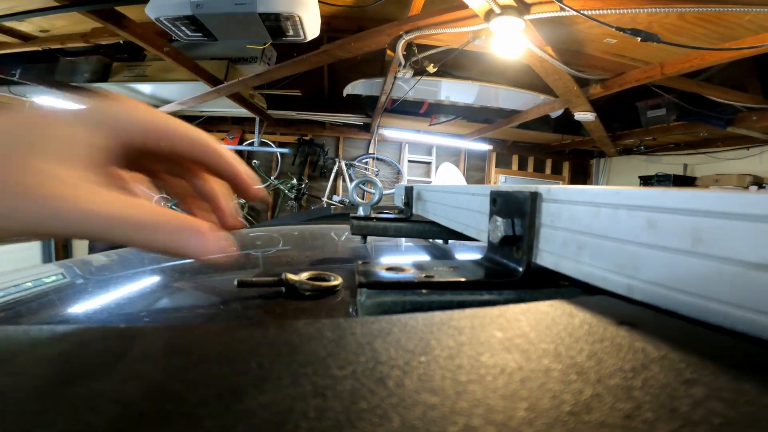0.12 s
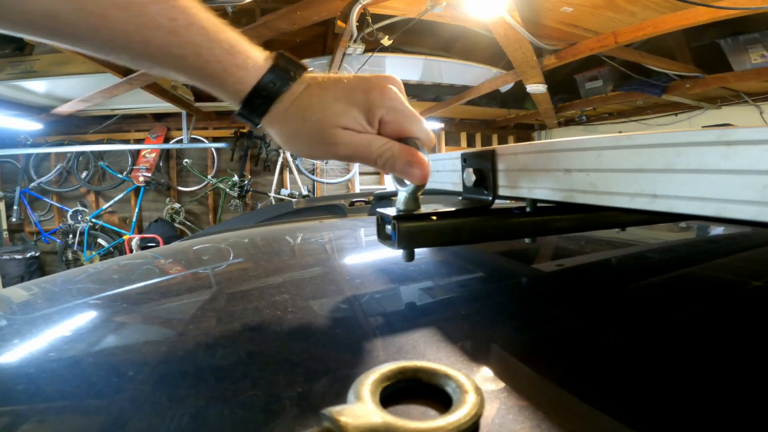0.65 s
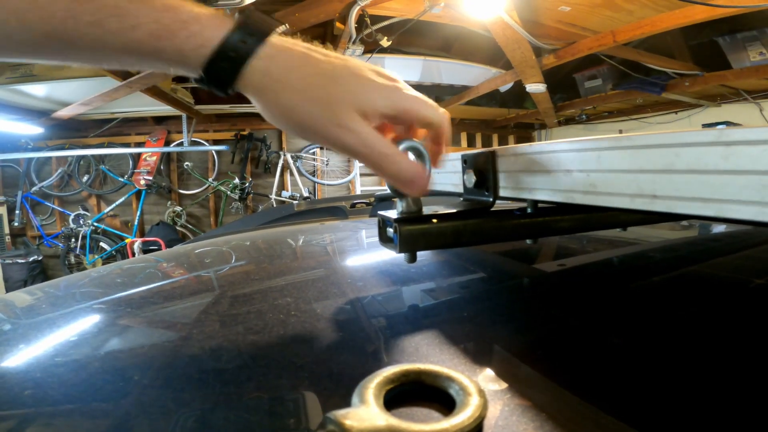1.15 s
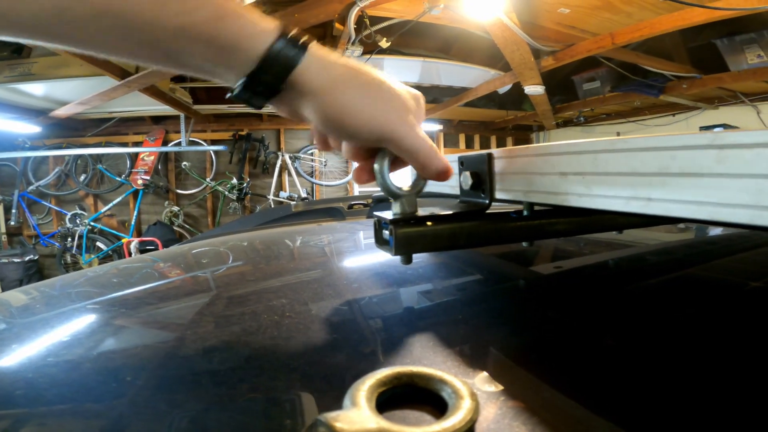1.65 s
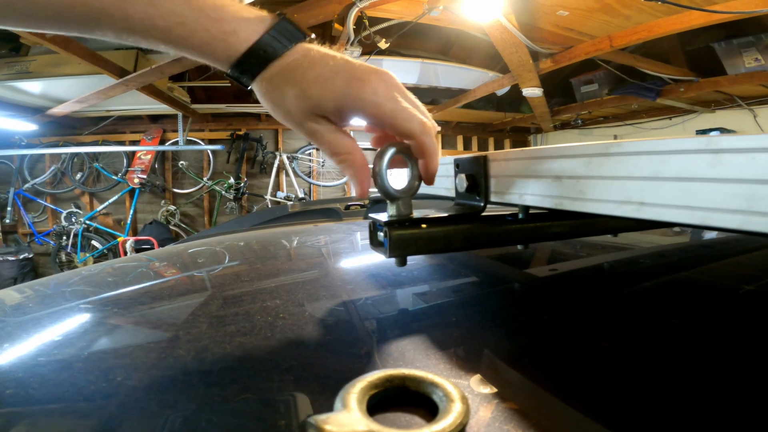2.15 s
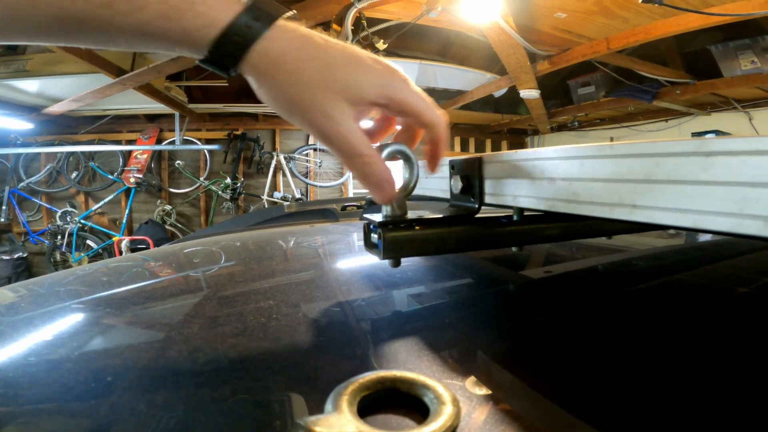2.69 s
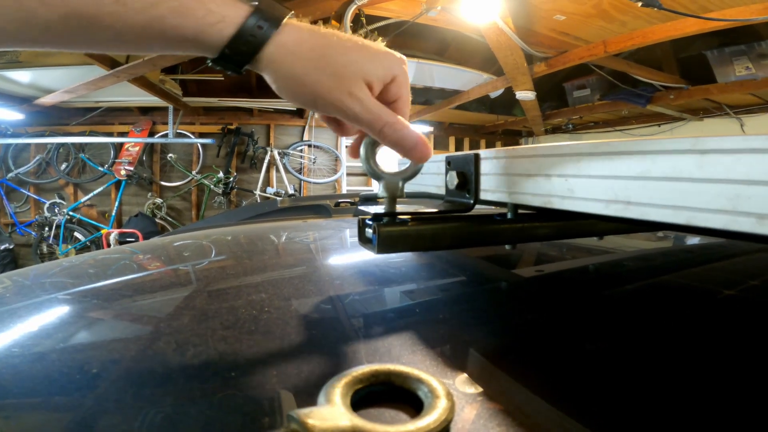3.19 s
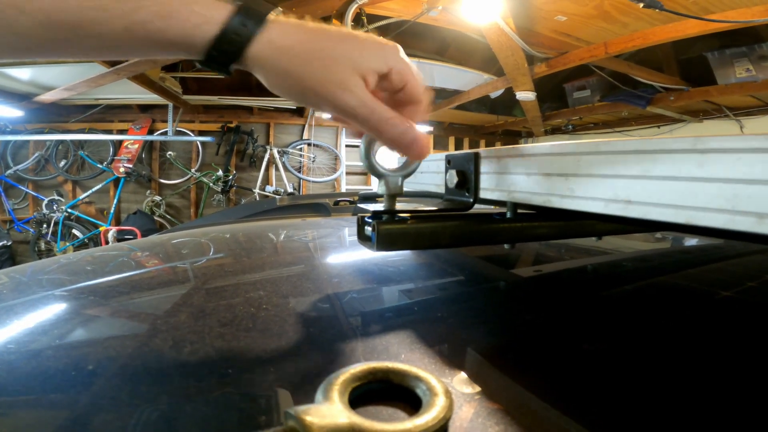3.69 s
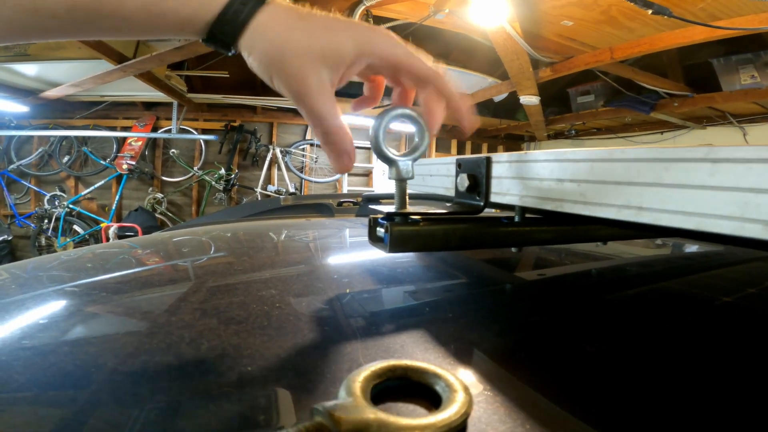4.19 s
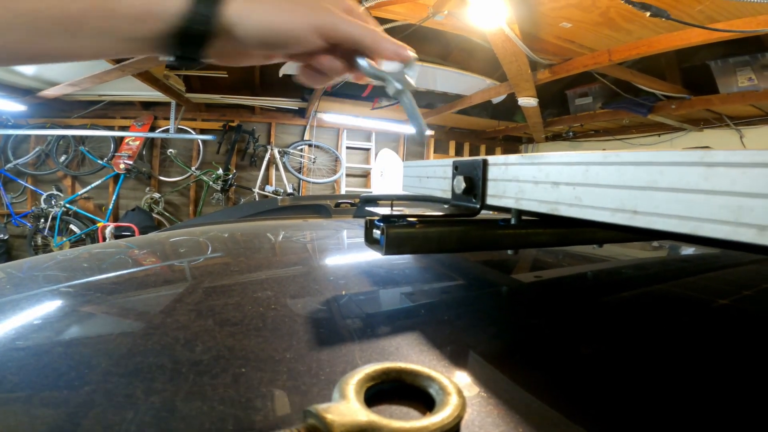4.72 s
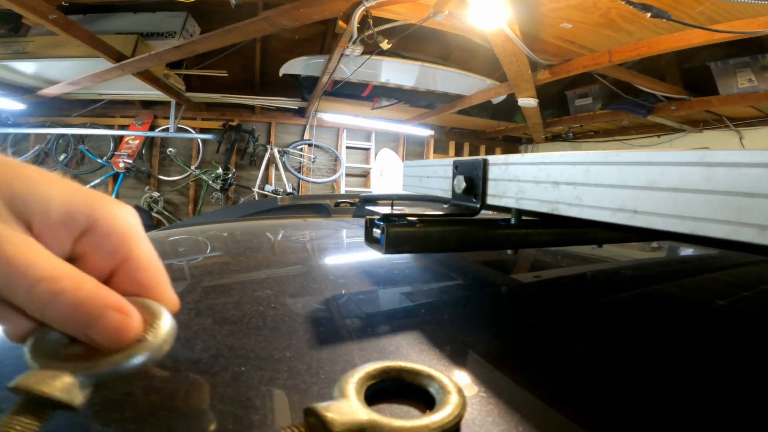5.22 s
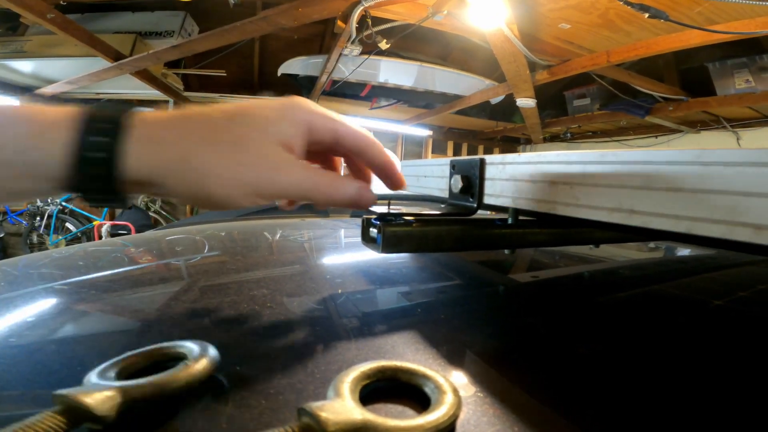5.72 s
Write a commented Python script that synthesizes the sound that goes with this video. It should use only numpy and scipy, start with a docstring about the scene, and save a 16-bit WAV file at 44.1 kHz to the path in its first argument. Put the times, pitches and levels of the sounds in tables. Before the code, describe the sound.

In a garage, a bolt is set down on a car roof with a quick clattering clunk. A hand then loosens a steel eye bolt from a rack channel: one loud knock, then small clicks, scrapes and short squeaks, each drumming dully through the roof. A bright clink frees it; after a pause it lands with several hard clunks. The microphone sits close on the roof, with faint low hum.

```python
"""Metallic chatter, knocks, a wavering squeak and dull drumming on a car roof, over mains hum and faint hiss.
A hand unscrews a steel eye bolt from a roof-rack channel in a garage, heard from the car roof.
Stick-slip catches and blows ring the modes of the channel, the loose bolt and the roof panel.
Bolts set down strike the panel; fading noise bands answer for sheet metal and garage walls."""
import sys
import numpy as np
from scipy import signal
from scipy.fft import rfft, irfft
from scipy.io import wavfile
from scipy.ndimage import uniform_filter1d

SR = 44100
rng = np.random.default_rng(int(sys.argv[2]) if len(sys.argv) > 2 else 0)


def persist_wave(psi):
    """Save psi, clipped to +-1, as 16-bit WAV."""
    counts = np.round(np.clip(psi, -1, 1) * 32767).astype(np.int16)
    wavfile.write(sys.argv[1], SR, np.atleast_2d(counts).T)


def how_loud(loudness_db):
    """Turn decibels into a plain amplitude multiplier (0 dB gives 1, 20 dB gives 10)."""
    steps = np.asarray(loudness_db, float) / 20
    return 10 ** steps


N = 257984

# bolt and fingers knocking the channel:
# (time [s], blow [dB], sharpness [dB], roof panel [dB], bite [dB])
KNOCK_ROWS = [(0.252, -56.5, -77, -39, -74), (0.312, -54, -76, -38, -74), (0.437, -54.5, -60, -17.5, -64),
              (0.562, -49, -72.5, -25, -53.5), (0.75, -5, -17, 2, -10.5), (1.103, -46.5, -46.5, -25.5, -74),
              (1.129, -39.5, -50, -69, -77), (1.446, -16, -41, -7, -31), (1.489, -28.5, -38, -12.5, -38.5),
              (1.993, -47, -41.5, -35, -50.5), (2.078, -68.5, -55.5, -60.5, -70),
              (2.151, -32.5, -56.5, -26.5, -56.5), (2.411, -18, -31, -11, -40.5),
              (2.557, -46, -40, -26, -65), (2.757, -12, -49.5, -10, -21), (2.822, -33, -73, -37, -26.5),
              (3.069, -25.5, -72, -53, -37.5), (3.168, -13, -20.5, -49.5, -12.5),
              (3.476, -38, -80, -30.5, -44), (3.567, -32, -54, -19, -24), (3.914, -20, -70, -16, -73),
              (3.959, -28.5, -59, -31, -25), (4.087, -36, -47, -32.5, -26), (4.324, -33.5, -72, -47.5, -59),
              (4.588, -47, -23, -23, -28.5), (4.834, -62.5, -50, -68.5, -77)]
# pushes that rock the car body, each starting with a thump:
# (time [s], sway [dB], thump [dB], held [s])
PUSH_ROWS = [(.04, -27.5, -44, 0.029), (.17, -29.5, -66.5, 0.17), (.437, -25.5, -25, 0.14),
             (.56, -40, -23.5, 0.024), (.7, -39.5, -67, 0.013), (.76, -12, -35.5, 0.091),
             (.9, -31.5, -37, 0.22), (1.11, -38, -37, 0.27), (1.489, -20.5, -21, 0.22),
             (1.89, -40.5, -56.5, 0.016), (2.0, -35.5, -73.5, 0.22), (2.411, -26.5, -25, 0.14),
             (2.64, -47, -35.5, 0.039), (2.83, -24, -31.5, 0.1), (3.2, -38, -45.5, 0.29),
             (3.69, -30.5, -63.5, 0.13), (4.1, -31, -58, 0.068), (4.2, -37.5, -46.5, 0.045),
             (4.5, -35, -34.5, 0.18), (4.9, -34.5, -53.5, 0.027), (5.05, -36.5, -91.5, 0.17)]
# modes of roof panel and car body: (frequency [Hz], level [dB], t60 before scaling [s])
ROOF_MODES = [(70.8, 2, 0.09), (81.3, -3.5, 0.19), (106.24, -5.5, 0.31), (128, -21.5, 0.078),
              (173, -12, .2), (186.9, -4, 0.33), (194, -8.5, 0.54), (214.9, -4, 0.44), (246.6, -1, 0.2),
              (273, -9, 0.16), (333.7, -4.5, 0.1), (376.7, -8, 0.095), (443.5, -14, 0.068),
              (463, -6.5, 0.05), (534, 3, 0.046), (654, -3.5, 0.15), (701, -1.5, 0.15), (780, -6.5, 0.06),
              (899.5, -1.5, 0.15), (968, -3, 0.072), (1222, -9, 0.021), (1454, -7.5, 0.077),
              (1760, -8, .06)]
# where the bolts land:
# (from [s], left minus right [dB], loudest low mode [Hz], loudest upper mode [Hz])
LANDING_SPOTS = [(0, -2.9, 180, 1046), (5.2, 2.5, 226, 584), (5.45, 1.9, 197, 695), (5.66, 2.3, 201, 780),
                 (5.74, 1.8, 197, 654)]
BODY_TOP_HZ, PANEL_TOP_HZ = 140, 480  # roof modes: car body, low panel, upper panel
BITE_FROM_HZ, SHARP_FROM_HZ = 2050, 4300  # channel: dull, biting, sharp


def steep(x, hz, kind, order=2):
    """Butterworth low- or high-pass."""
    return signal.sosfilt(signal.butter(order, hz, kind, fs=SR, output="sos"), x)


def colour(x, points):
    """Causal filter through (frequency [Hz], gain [dB]) points, from the cepstrum of the log gain."""
    hz, db = np.transpose(points)
    bins_hz = np.maximum(np.fft.rfftfreq(8192, 1 / SR), 1)
    cepstrum = irfft(np.log(how_loud(np.interp(np.log(bins_hz), np.log(hz), db))))
    cepstrum[1:4096] *= 2  # fold to minimum phase
    cepstrum[4097:] = 0
    impulse = irfft(np.exp(rfft(cepstrum)))[:4096]
    return signal.oaconvolve(x, impulse)[:len(x)]


def ring(force, hz, t60_s):
    """One mode: a unit blow leaves a fading sine of height 1."""
    r = np.exp(-np.log(1000) / (t60_s * SR))
    w = 2 * np.pi * hz / SR
    return signal.lfilter([0, r * np.sin(w)], [1, -2 * r * np.cos(w), r * r], force)


def walk(rate_hz):
    """Gaussian random levels, a new one each 1 / rate_hz, joined by linear slews."""
    k = int(SR / rate_hz)
    return uniform_filter1d(np.repeat(rng.standard_normal(N // k + 1), k), k)[:N]


def blows(table, column, scatter_db, flip=True):
    """Impulses sized by one column; each lands on another spot, so size and, with flip, sign vary."""
    rows, force = np.array(table), np.zeros(N)
    chance = rng.standard_normal((len(rows), 2))
    sign = np.sign(chance[:, 1]) if flip else 1
    force[(rows[:, 0] * SR).astype(int)] = how_loud(rows[:, column] + scatter_db * chance[:, 0]) * sign
    return force


def crack(table, column, fade_s):
    """Each blow as fresh noise that builds in about a ms and fades with time constant fade_s."""
    swell = blows(table, column, 0, False)
    for s in (fade_s, .0008):
        swell = signal.lfilter([1], [1, -np.exp(-1 / (SR * s))], swell)
    return swell / (SR * 0.00084) * rng.standard_normal(N)


def held(table, column, rest_db, fade_db_per_s):
    """Each row sets in, holds its level and dies away at a steady rate in dB."""
    t, gain = np.arange(N) / SR, how_loud(rest_db)
    for row in table:
        early_s = np.maximum(row[0] - t, 0)
        late_s = np.maximum(t - row[0] - row[-1], 0)
        gain = gain + how_loud(row[column] - 498.5 * early_s - fade_db_per_s * late_s)
    return gain


def pan(x, left_db):
    """Left minus right by left_db."""
    return x * how_loud(np.array([[.5], [-.5]]) * left_db)


def landing(column):
    """One column of the landing spots, held from sample to sample until the next spot."""
    spots = np.array(LANDING_SPOTS)
    return spots[np.searchsorted(spots[:, 0], np.arange(N) / SR, "right") - 1, column]


def garage():
    """Mains hum that wavers, over low rumble and thin hiss."""
    # room noise: (frequency [Hz], relative level [dB per Hz])
    air_spectrum = [(15, -54.5), (25, -39.5), (40, -20.5), (64, 10), (77, -8.5), (88, -27.5), (115, -3.5),
                    (145, -14), (701, -46), (2060, -61), (3300, -65), (5300, -42.5), (13200, -74)]
    mid, side = (colour(rng.standard_normal(N), air_spectrum) for _ in range(2))
    hum_hz, hum_db, air_db = 59.6, -52.5, -51
    hum = how_loud(hum_db + 0.58 * walk(5)) * np.sqrt(2) * np.sin(2 * np.pi * hum_hz * np.arange(N) / SR)
    apart = (.3 * side + .5 * steep(side, 6000, "high")) * np.array([[1], [-1]])
    return hum + how_loud(air_db) * (mid + apart) / mid.std()


def grit(rate_hz, spread_db):
    """Stick-slip catches of the thread: dense, uneven and clumped; rms 1."""
    sizes = how_loud(spread_db * rng.exponential(size=N)) * rng.standard_normal(N)
    catches = (rng.random(N) < rate_hz / SR) * sizes
    catches = catches * how_loud(2 * walk(220))  # clumps
    return catches / catches.std()


def turning(column):
    """Gain of one layer of the hand's strokes on the thread."""
    # (time [s], chatter [dB], sharpness [dB], load on roof panel [dB], held [s])
    stroke_rows = [(0.0, -34.5, -57, -12, 0.026), (.09, -52, -61.5, -35, 0.091),
                   (.435, -68, -69, -41.5, 0.11), (.6, -62, -62, -56, 0.21), (.765, -46.5, -52, -26, 0.037),
                   (.82, -43, -66, -47, 0.096), (1.11, -59.5, -64.5, -59, 0.064),
                   (1.44, -83, -79, -46, 0.064), (1.55, -44.5, -54, -33, 0.16),
                   (1.82, -88, -74, -44, 0.098), (1.98, -80, -74.5, -51.5, 0.2),
                   (2.3, -54, -58.5, -35.5, 0.2), (2.39, -31.5, -39, -20.5, 0.0037),
                   (2.62, -91, -97, -39.5, 0.029), (2.775, -48.5, -67.5, -19.5, 0.056),
                   (3.07, -57.5, -71, -33, 0.064), (3.18, -50.5, -60, -20, 0.015),
                   (3.29, -78, -82.5, -51, 0.137), (3.54, -40.5, -66.5, -32, 0.03),
                   (3.59, -50, -71.5, -28.5, 0.082), (3.92, -55, -71, -30, 0.047),
                   (4.09, -56.5, -67, -32.5, 0.0353), (4.34, -46, -69.5, -30.5, 0.038),
                   (4.43, -77.5, -76, -31.5, 0.16), (5.12, -71.5, -74, -62, 0.26),
                   (5.28, -49.5, -71, -56, .03), (5.47, -72, -62, -66, 0.025), (5.56, -51, -64, -68, 0.069),
                   (5.75, -61, -88, -77.5, 0.039), (5.83, -69, -66, -61, .03)]
    # between strokes: (unused, chatter [dB], sharpness [dB], load on roof panel [dB])
    rest_levels = (0, -76, -98, -68.5)
    return held(stroke_rows, column, rest_levels[column], fade_db_per_s=249)


def rack(catches):
    """Chatter, slips and knocks ring the channel; bite and sharpness feed its higher modes."""
    # channel with bolt: (frequency [Hz], least width [Hz], level [dB])
    rack_modes = [(372.3, 35, -2), (470.4, 57, -9.5), (616, 50, -9.5), (744, 40, -10), (929, 240, -8),
                  (1069, 23, -6.5), (1178, 20, -8), (1250, 27, -9), (1740, 110, -0.5), (1777, 55, -6.5),
                  (1950, 280, -16.5), (2343, 320, -9.5), (2930, 65, -28.5), (3260, 130, -34),
                  (3602, 130, -32.5), (4500, 160, -36), (5520, 740, -16), (5660, 700, -44), (7460, 83, -31),
                  (8500, 130, -46), (11100, 550, -43.5)]
    rub_damp_hz = 1.2e5  # a rubbed mode is at least hz * hz / this wide
    chatter, sharpness = turning(1), turning(2)
    out = 0
    for k, (hz, width_hz, db) in enumerate(rack_modes):
        if hz > SHARP_FROM_HZ:
            rub = how_loud(14.5) * sharpness + how_loud(-10.5) * slips(column=2)
            force, lift_db = how_loud(-0.5) * blows(KNOCK_ROWS, column=2, scatter_db=3), 19
        elif hz > BITE_FROM_HZ:
            rub = how_loud(-1.0) * chatter + how_loud(1.0) * slips(column=4)
            force, lift_db = how_loud(-13.0) * crack(KNOCK_ROWS, column=4, fade_s=0.0022), 9
        else:
            rub = how_loud(-6.5) * chatter + how_loud(-7.0) * slips(1, hz, focus_db=29.5)
            force, lift_db = how_loud(-31.0) * crack(KNOCK_ROWS, column=1, fade_s=0.0076), 0
        force = force + catches * rub * how_loud(-27 + 3.5 * walk(30))
        t60_s = np.log(1000) / np.pi / max(width_hz, hz * hz / rub_damp_hz)
        out = out + (-1) ** k * how_loud(db + lift_db) * ring(force, hz, t60_s)
    return out


def contact(catches):
    """The broad noise of rubbing and knocking, in a dull, a biting and a sharp part."""
    # contact click under the modes: (frequency [Hz], level [dB per Hz])
    click_spectrum = [(300, -3), (700, -4.5), (1300, 1), (2000, -5.5), (3000, -11), (4000, -14), (6000, -1),
                      (9000, -15), (11000, -21.5), (13000, -24), (16000, -27)]
    dull_rub = turning(1) + how_loud(-13.5) * slips(column=1)
    bite_rub = how_loud(-2.0) * turning(1) + how_loud(-2.5) * slips(column=4)
    sharp_rub = turning(2) + how_loud(-10) * slips(column=2)
    parts = ((0, BITE_FROM_HZ, dull_rub, how_loud(-0.5) * crack(KNOCK_ROWS, 1, 0.012)),
             (BITE_FROM_HZ, SHARP_FROM_HZ, bite_rub, how_loud(7.0) * crack(KNOCK_ROWS, 4, 0.015)),
             (SHARP_FROM_HZ, SR, sharp_rub, how_loud(4.0) * crack(KNOCK_ROWS, 2, 0.0033)))
    out = 0
    for low_hz, top_hz, rub, hits in parts:
        points = [(hz, db if low_hz <= hz <= top_hz else db - 27.0) for hz, db in click_spectrum]
        out = out + colour(how_loud(9.5) * catches * rub + hits, points)
    return out


def shaken_roof(catches):
    """Low modes of panel and car body, shaken by strokes, knocks and pushes through the rack's feet."""
    foot_hz, foot_db_per_octave = 243, 8.5  # mode nearest the rack's foot; fall-off away from it
    # rubber feet stretch a knock into a push and let it through late
    feet_s, feet_lag_s = 0.0029, .004
    feet = np.hanning(int(feet_s * SR) + 3)
    load, rocking = turning(3), sway()
    out = 0
    for hz, db, t60_s in ROOF_MODES:
        if hz >= PANEL_TOP_HZ:
            continue
        if hz < BODY_TOP_HZ:
            shake = rocking
            push = blows(PUSH_ROWS, column=2, scatter_db=1.0, flip=False)
        else:
            shake = load
            push_db = -12.0 - foot_db_per_octave * abs(np.log2(hz / foot_hz))
            push = how_loud(push_db) * blows(KNOCK_ROWS, column=3, scatter_db=2.5, flip=hz > 210)
        push = np.roll(np.convolve(push, feet / feet.sum())[:N], int(feet_lag_s * SR))
        force = how_loud(-39.0) * shake * catches + push
        level_db = db - 2 * max(np.log2(hz / 270), 0)
        out = out + how_loud(level_db) * ring(force, hz, max(0.77 * t60_s, .02))
    return out


def struck_roof():
    """Bolts set down: a broad clunk on painted sheet metal plus the panel modes it rings."""
    # (time [s], blow [dB], sharpness [dB], roof panel [dB], car body [dB])
    drop_rows = [(0.004, -7.5, -32, -20, -12.5), (0.025, -20.5, -62, -14, -36),
                 (0.04, -16.5, -53, -28.5, -46), (0.058, -23, -75.5, -23.5, -46.5),
                 (5.253, -27.5, -50, -50, -49), (5.264, -10.5, -17.5, -5.5, -44),
                 (5.301, -18, -60, -34, -48), (5.328, -23.5, -49, -39, -43), (5.364, -36, -72.5, -20, -52),
                 (5.478, -37.5, -51.5, -32, -47), (5.511, -18, -52, -11, -12.5),
                 (5.545, -6.5, -19, -20.5, -1.5), (5.562, -13.5, -41, -7.5, -13.5),
                 (5.589, -20, -66.5, -22, -33), (5.614, -29, -67, -28, -34),
                 (5.651, -52, -83.5, -13.5, -28), (5.678, -11.5, -52.5, -20.5, -21),
                 (5.765, -9.5, -41, -21.5, -56), (5.787, -31, -50, -41.5, -22)]
    # dull part and sharp part of the clunk, each: (frequency [Hz], level [dB per Hz])
    dull_clunk, sharp_clunk = [(200, -34.5), (500, 1.5), (1000, 5.5), (2000, -10.5), (3500, -28),
                               (6000, -46.5)], [(2000, 10), (4000, 0.5), (6500, -3.5), (10000, -22.5),
                               (15000, -23.5)]
    spot_db_per_octave = 8.5  # fall-off away from a loudest mode
    thud = np.hanning(int(0.0016 * SR) + 3)  # the heavy eye presses the low modes softly
    out = how_loud(0.5) * colour(crack(drop_rows, 1, 0.0072), dull_clunk)
    out = out + how_loud(6.5) * colour(crack(drop_rows, 2, 0.0015), sharp_clunk)
    low_spot_hz, upper_spot_hz = landing(2), landing(3)
    for hz, db, t60_s in ROOF_MODES:
        if hz <= 95:
            continue
        column = 4 if hz < BODY_TOP_HZ else 3 if hz < PANEL_TOP_HZ else 1
        upper = column == 1
        force = how_loud(-18 if upper else -7) * blows(drop_rows, column, scatter_db=4.0, flip=hz > 300)
        if column < 4:
            spot_hz = upper_spot_hz if upper else low_spot_hz
            force = force * how_loud(1.5 - spot_db_per_octave * abs(np.log2(hz / spot_hz)))
        if not upper:
            force = np.convolve(force, thud / thud.sum())[:N]
        # paint damps the upper modes
        out = out + how_loud(db) * ring(force, hz, np.clip(2.2 * t60_s, .02, 70 / hz))
    return out


def tails():
    """Two unlike answers of panels and walls: noise bands about an octave wide, each with its own fade."""
    # dense ringing of sheet metal and garage walls: (frequency [Hz], relative level [dB], t60 [s])
    tail_bands = [(60, -29, 0.1), (176, -25.5, 0.75), (447, -12, 0.27), (1200, -13.5, 0.15),
                  (2430, -8, 0.19), (5000, -11, 0.28), (8000, -6.5, 0.13)]
    t = np.arange(SR * 3 // 4) / SR
    build = 1 - np.exp(-t / 0.00094)
    out = 0
    for hz, db, t60_s in tail_bands:
        sos = signal.butter(2, [hz / 1.734, hz * 1.297], "band", fs=SR, output="sos")
        band = signal.sosfilt(sos, rng.standard_normal((2, len(t))))
        out = out + how_loud(db - 29.0 - 60 * t / t60_s) * band * build / np.sqrt(hz / 5000)
    return out


def sway():
    """Gain of the car body's rocking under the pushes."""
    return held(PUSH_ROWS, column=1, rest_db=-62.5, fade_db_per_s=200.5)


def eye():
    """Each clink rings the free modes near its loudest one; the loose fit makes the rings flutter."""
    # the loose bolt clinks against the channel: (time [s], level [dB], loudest ring [Hz])
    flick_rows = [(0.441, -52.5, 1020), (0.75, -11.5, 1410), (0.759, -12.5, 1250), (1.446, -31.5, 1250),
                  (1.451, -38, 1950), (1.705, -31, 1250), (2.412, -19.5, 1250), (3.115, -33, 1286),
                  (2.758, -43, 3900), (2.761, -34, 1780), (2.821, -38, 2930), (2.826, -26, 1630),
                  (3.169, -29, 3700), (3.168, -24, 1250), (3.168, -24, 5690), (3.178, -33, 2440),
                  (3.607, -26, 1250), (3.614, -28, 1020), (3.62, -28, 1730), (3.913, -33.5, 1440),
                  (4.356, -30.5, 1680), (4.391, -34, 1770), (4.455, -38, 1950), (4.43, -55.5, 4330),
                  (4.506, -51, 4400), (4.397, -47, 5480), (4.431, -49.5, 5480), (4.528, -41.5, 1950),
                  (4.546, -25, 1150), (4.56, -34, 5520), (4.577, -38.5, 5520), (4.594, -45.5, 5520),
                  (4.58, -13, 1174), (4.588, -11.5, 1250), (4.594, -23.5, 1185), (4.597, -41, 4400),
                  (4.613, -55, 1800), (4.6, -34.5, 385), (5.505, -33, 6430)]
    # bolt and channel ringing freely: (frequency [Hz], level [dB], t60 [s])
    bolt_modes = [(385, 0, .12), (1020, 0, .06), (1130, -2, .04), (1225, -3, .04), (1262, -2, .045),
                  (1340, -3, .04), (1460, 0, .04), (1700, -4, .05), (1735, -6, .12), (1782, -8, .2),
                  (1950, -2, .05), (2350, -2, .04), (2930, -4, .07), (3260, -6, .1), (3770, 0, .06),
                  (3955, -7, .14), (4330, -4, .07), (4390, -19, .2), (5480, -4, .06), (5560, -10, .12),
                  (5640, -5, .07), (6200, 0, .012)]
    focus_db_per_octave, clink_s = 80, .003  # a clink builds over a few contacts
    out = 0
    for hz, db, t60_s in bolt_modes:
        rows = [(s, size_db - focus_db_per_octave * abs(np.log2(hz / top_hz)))
                for s, size_db, top_hz in flick_rows]
        build = np.hanning(int(clink_s * SR) + 3)
        build = 2 * build / build.sum() * np.cos(2 * np.pi * hz * np.arange(len(build)) / SR)
        force = np.convolve(blows(rows, column=1, scatter_db=5.0, flip=False), build)[:N]
        out = out + how_loud(db + 4 * walk(160)) * ring(force, hz, t60_s)
    return out


def slips(column, hz=None, focus_db=0, squeak=False):
    """Slips swell and fade alike, less in modes far from the loudest ring.
    With squeak, the stick-slip locks onto that ring and gives a wavering tone."""
    # short slips of the thread or a finger:
    # (time [s], level [dB], sharpness [dB], loudest ring [Hz], bite [dB])
    slip_rows = [(0.683, -35.5, -45.5, 1148, -45.5), (0.703, -25.5, -51.5, 1200, -41),
                 (0.89, -56, -26, 1174, -50.5), (0.989, -48.5, -41, 947, -67),
                 (1.162, -49, -39, 1264, -71.5), (1.255, -46, -64, 1230, -67.5),
                 (1.433, -28.5, -55, 1250, -55.5), (1.455, -23, -37, 1250, -34),
                 (1.498, -29, -41, 607, -41), (1.548, -32, -44, 1240, -61), (1.61, -28, -50.5, 1250, -71),
                 (1.663, -55, -44.5, 1165, -53), (1.696, -31, -45, 1207, -48), (1.851, -48, -47, 1226, -59),
                 (2.296, -33.5, -50, 1250, -64), (2.329, -29.5, -40.5, 1333, -42.5),
                 (2.372, -24.5, -54.5, 1250, -45), (2.443, -28, -53, 1177, -59.5),
                 (2.473, -33, -45, 1160, -40.5), (2.604, -36.5, -48.5, 1164, -55),
                 (2.8, -24.5, -81, 1798, -41), (2.894, -35, -67, 593, -61.5), (3.085, -26.5, -53, 977, -49),
                 (3.11, -17.5, -56, 1362, -35.5), (3.145, -20.5, -62, 1746, -29),
                 (3.165, -17, -31, 1760, -17.5), (3.224, -33, -53.5, 1810, -73),
                 (3.311, -34.5, -50.5, 1690, -43.5), (3.538, -45, -58, 1730, -56.5),
                 (3.575, -19, -65.5, 1757, -46), (3.601, -16, -53, 793, -35), (3.614, -36, -62, 1030, -53),
                 (3.625, -38, -66, 1410, -33), (3.658, -25.5, -66.5, 1692, -40.5),
                 (3.748, -44, -59, 1204, -53), (3.894, -35.5, -63, 1310, -67),
                 (3.984, -25, -52, 1838, -33.5), (4.088, -29, -66, 1933, -37.5),
                 (4.342, -21.5, -44.5, 1621, -70.5), (4.385, -21.5, -40.5, 1660, -62),
                 (4.429, -23, -41, 1250, -45.5), (4.445, -23.5, -57, 1950, -76),
                 (4.496, -33, -45.5, 1250, -59.5), (4.532, -19, -37, 985, -51),
                 (4.558, -18, -37, 1250, -45), (4.574, -13.5, -32.5, 1250, -33),
                 (4.588, -28.5, -59, 384, -56), (5.431, -52, -51, 716, -61.5)]
    swell_s = .013  # onset to peak
    x = np.arange(0, 4, 1 / (swell_s * SR))
    gain, waver = np.zeros(N + SR), walk(250) if squeak else None
    for row in slip_rows:
        off_db = focus_db * abs(np.log2(hz / row[3])) if hz else 0
        start = int(row[0] * SR)
        swell = how_loud(row[column] - off_db) * (x * np.exp(1 - x)) ** 2
        if squeak:
            tone_hz = row[3] * (1 + 0.041 * waver[start:start + len(x)])
            swell = swell * np.sin(2 * np.pi * np.cumsum(tone_hz) / SR)
        gain[start:start + len(x)] += swell
    return gain[:N]


def scene():
    """Rack a little to the right, roof under the microphone; tails differ left and right."""
    catches = grit(4000, 2.0)
    shaken = shaken_roof(grit(4000, 1.5))
    squeak = how_loud(-14.5) * slips(1, squeak=True)
    near = rack(catches) + contact(catches) + shaken + eye() + squeak
    struck = steep(struck_roof(), 97, "high", order=4)  # the thud has little below about 100 Hz
    tail, other_tail = tails()
    side = signal.oaconvolve(near + struck, other_tail)[:N]
    near, struck = (x + signal.oaconvolve(x, tail)[:N] for x in (near, struck))
    lag = .7 * steep(np.gradient(near), 4500, "low")  # the right port is nearer by about a sample
    apart = 0.65 * steep(side, 300, "high") + 0.61 * steep(side, 300, "low") - lag
    apart = apart + .6 * steep(np.roll(near, 9), 10500, "high", order=4)
    apart = apart * np.array([[1], [-1]])
    return pan(near, -1.5) + apart + pan(struck, landing(1)) + garage()


def low_pass(x):
    """Removes everything above the highest recorded frequency."""
    return signal.sosfilt(signal.butter(12, 15700, fs=SR, output="sos"), x)


def record(dry):
    """A small microphone loses the top and rounds the highest peaks."""
    dull = np.array([steep(x, 13300, "low", order=6) for x in dry])
    mix = np.tanh(0.57 * dull) / 0.6
    return low_pass(mix)


dry = scene()
out = record(dry)
persist_wave(out)
```